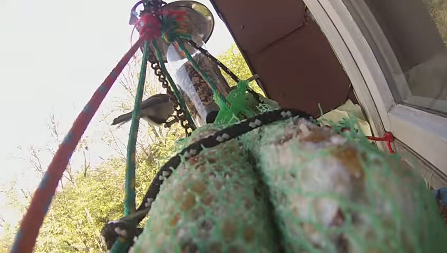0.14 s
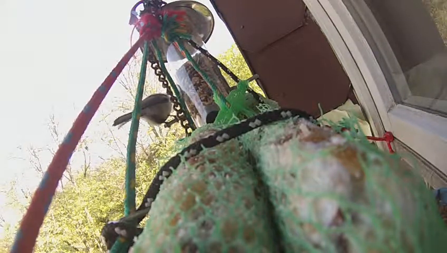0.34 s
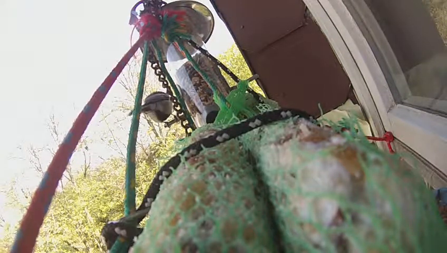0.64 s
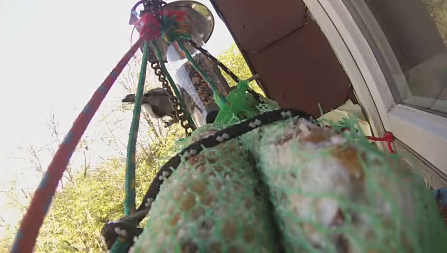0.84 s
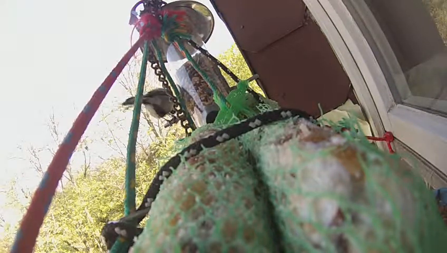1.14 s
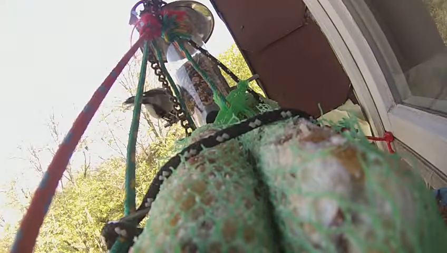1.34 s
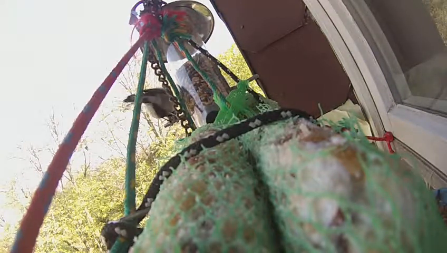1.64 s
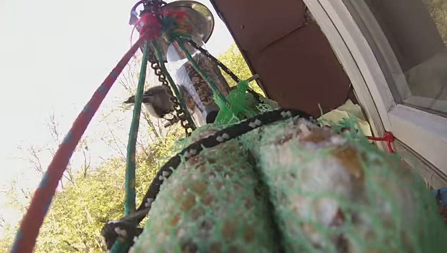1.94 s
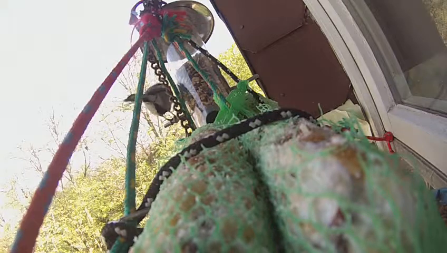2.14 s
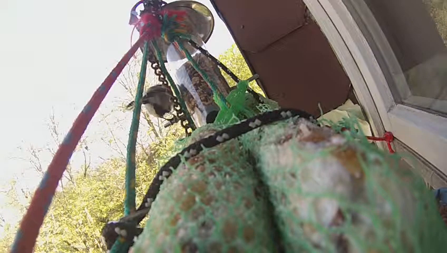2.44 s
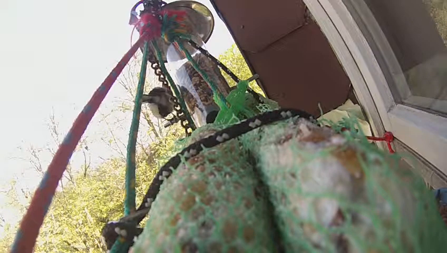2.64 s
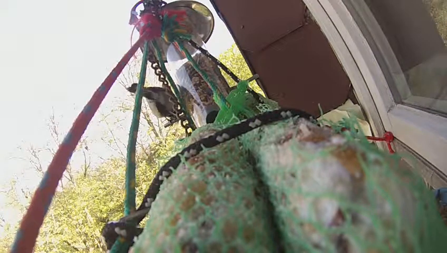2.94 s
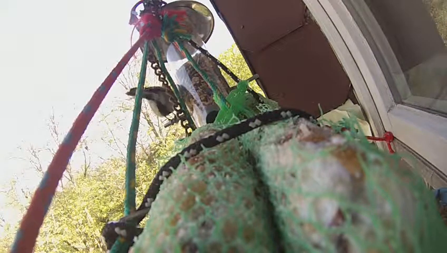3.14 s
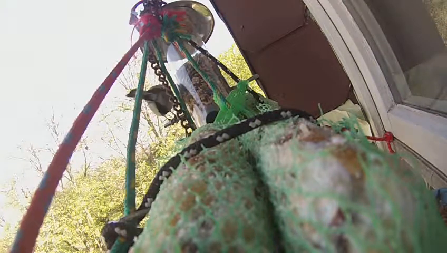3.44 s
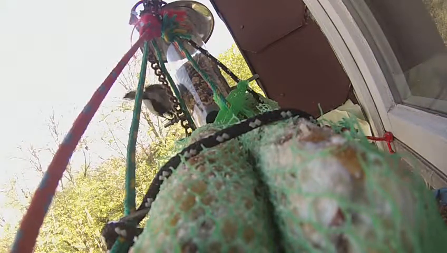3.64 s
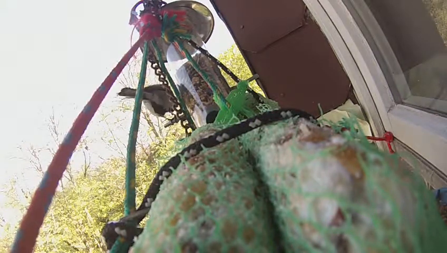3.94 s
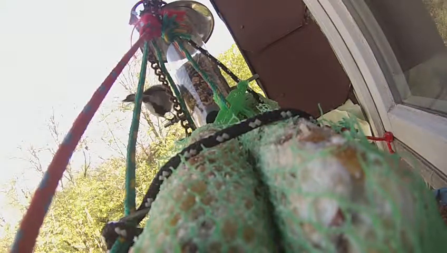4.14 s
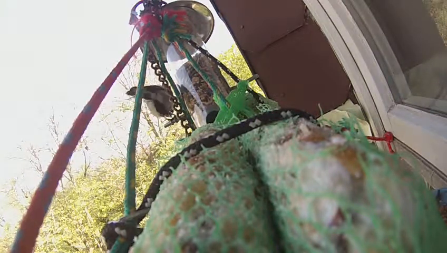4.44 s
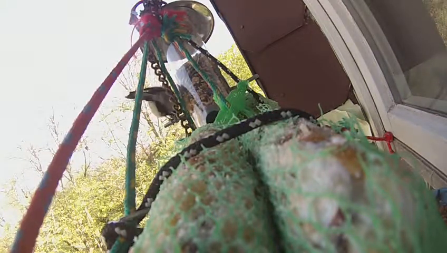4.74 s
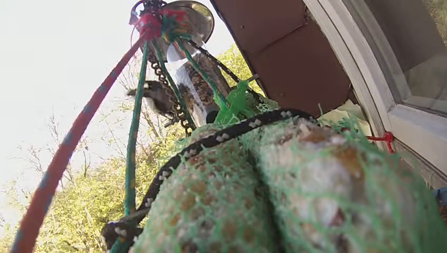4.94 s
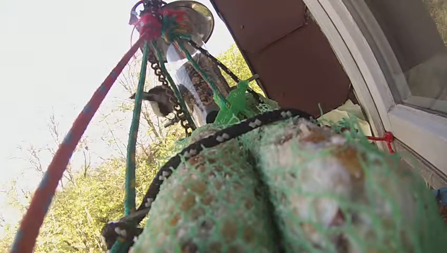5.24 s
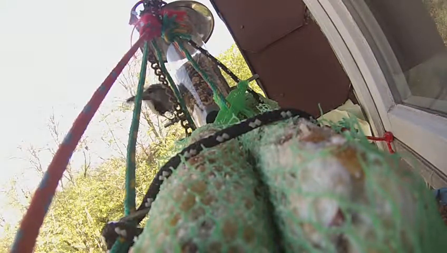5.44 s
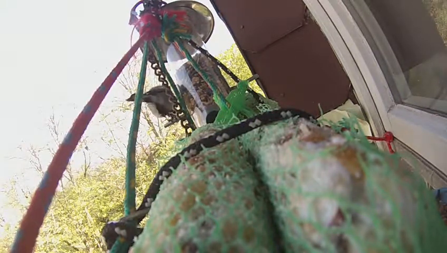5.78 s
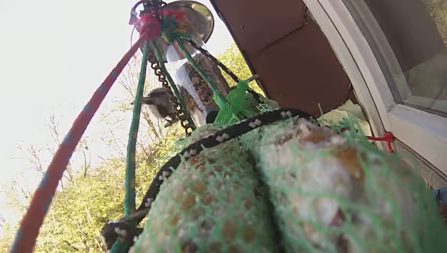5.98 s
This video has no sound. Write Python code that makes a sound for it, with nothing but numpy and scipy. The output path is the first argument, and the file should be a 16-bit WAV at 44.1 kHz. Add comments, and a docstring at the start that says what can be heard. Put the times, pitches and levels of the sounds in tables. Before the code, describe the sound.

Low trembling of a hanging feeder, felt through its hanger by a very close microphone, is broken by groups of woody, bassy pecks. The strongest group arrives around two seconds, including a hard clack; another follows after three and a half, and a final pair near the end. Loose parts chatter lightly. Steady outdoor air, thin hiss and a faint electronic buzz continue throughout.

```python
"""Bird pecking at a seed feeder

A small bird pecks at a hanging feeder; the microphone rides on the same hanger.
Blows ring modes of hanger and tube, loose parts chatter, the beak ticks and one hard clack sounds.
The hanger quivers near 33 Hz under a dull rumble; two far birds call as gliding two-partial tones.
Shaped noise makes the outdoor air, hiss and gated buzz; steady sines make the electronic whine."""
import sys
import numpy as np
from scipy import signal
from scipy.fft import rfft, irfft
from scipy.io import wavfile

SR = 44100
rng = np.random.default_rng(int(sys.argv[2]) if len(sys.argv) > 2 else 0)


def waveform_to_disk(signal):
    """Save audio, clipped to [-1, 1], as 16-bit WAV at the path in sys.argv[1]."""
    frames = np.transpose(np.atleast_2d(signal))
    scaled = np.clip(frames, -1, 1) * 32767
    samples = np.round(scaled).astype(np.int16)
    wavfile.write(sys.argv[1], SR, samples)


N = 269451
TIME = np.arange(N) / SR

# Pecks and taps. Each row: start in seconds, hanger thump in dB, tube ring in dB, rattle in dB
# before trim, beak tick in dB before trim, tube pitch as a ratio, swing height in dB rms.
PECKS = [(1.2849, -42, -49, -56.5, -72, 1.04, -43.5), (1.9942, -35.5, -46, -55.5, -66, 1.03, -45.5),
         (2.1421, -32, -45.5, -54.5, -62.5, 1, -35.5), (2.3082, -33.5, -45.5, -58, -63.5, .98, -36.5),
         (2.4407, -39.5, -57, -67, -82, 0.77, -59), (3.095, -55, -64, -84, -81, 1.05, -49.5),
         (3.589, -34.5, -48, -56, -65.5, 1, -42), (3.75, -32.5, -45.5, -53.5, -61, 1.015, -38.5),
         (3.939, -39, -57.5, -65, -71, 1.03, -38.5), (4.1282, -40.5, -56, -61, -75, 0.86, -41),
         (5.041, -34.5, -49, -63, -74, 1.04, -36.5), (5.555, -32.5, -52, -63.5, -72, 0.98, -37.5),
         (5.728, -34, -57.5, -78, -80, 1.05, -40)]


def undb(db):
    """Decibels to gain."""
    return 10 ** (np.asarray(db) / 20)


def level(x, db):
    """Set the rms level."""
    return x * undb(db) / np.sqrt(np.mean(x ** 2))


def strike(x, db, span_s):
    """Set the rms level of a blow over its first moments."""
    return x * undb(db) / np.sqrt(np.mean(x[:int(span_s * SR)] ** 2))


def add(out, s, x):
    """Mix a sound in at a time in seconds."""
    i = int(s * SR)
    out[i:i + len(x)] += x[:N - i]


def curves(table):
    """The columns of a timed table, joined by straight lines."""
    s, *columns = np.transpose(table)
    return [np.interp(TIME, s, c) for c in columns]


def walk(knots_per_s):
    """Slow random wander: normal draws joined by straight lines, spread near 1."""
    knots = rng.standard_normal(int(N / SR * knots_per_s) + 2)
    return np.interp(TIME * knots_per_s, np.arange(len(knots)), knots)


def noise(spectrum):
    """Noise with the colour of (Hz, dB) points, joined on a log frequency axis."""
    hz, db = np.transpose(spectrum)
    bins_hz = np.maximum(np.fft.rfftfreq(N, 1 / SR), 1)
    gain = undb(np.interp(np.log(bins_hz), np.log(hz), db))
    return irfft(rfft(rng.standard_normal(N)) * gain, N)


def soften(x, hz):
    """A longer, gentler contact loses its treble."""
    cutoff_hz = min(hz, SR / 3)
    return signal.sosfilt(signal.butter(2, cutoff_hz, fs=SR, output="sos"), x)


def ring(modes, spread, pitch=1):
    """A third of a second of a struck body; each contact point weights its decaying modes differently."""
    t = TIME[:SR // 3]
    weights = 1 + spread * rng.standard_normal(len(modes))
    out = np.zeros(len(t))
    for weight, (hz, db, t60_s, polarity) in zip(weights, modes):
        decay = np.exp(-np.log(1000) * t / t60_s)
        out += weight * np.sign(polarity) * undb(db) * np.sin(2 * np.pi * pitch * hz * t) * decay
    return out


def chatter(modes, length_s, count, detune=0.12, fade_db=-7):
    """A quick, uneven, dying run of tiny collisions between loose parts, each with its own pitch."""
    out = np.zeros(SR // 3)
    for k, (late, size, tuning) in enumerate(rng.random((count, 3))):
        progress = (k + 0.8 * late) / count
        i = int(progress * length_s * SR)
        hit = ring(modes, spread=0.41, pitch=1 + detune * (tuning - 0.5))
        gain = (0.5 + size) * undb(fade_db * progress ** 2)
        out[i:] += gain * hit[:len(out) - i]
    return out


def pecks(rattle_trim_db=0.86, tick_trim_db=-0.3, settle_db=-70, settle_s=0.052, firm_db=-54, firm_hz=3200):
    """The beak ticks, the hanger and tube ring, loose parts jump and fall back a moment later."""
    # Modes of the hanger, tube, loose fittings with chain, and port that the beak hits; close opposed
    # tube pairs make the ring swell after the blow. Each row: nominal pitch in Hz, relative level in dB,
    # t60 in seconds, polarity at the microphone (sign).
    hanger = [(48, -7, 0.082, 1), (59.55, -8, 0.385, 1), (78, 3, 0.094, -1), (115.4, -16.5, 0.15, -1),
              (149, -9, 0.023, 1)]
    tube_modes = [(256.2, -22.5, 0.16, 1), (280.6, -28, 0.22, -1), (364.7, 0.5, 0.044, 1),
                  (364.3, -4, 0.1, -1), (436, -6, 0.024, -1), (453, -15, 0.067, 1), (470.4, -36, 0.49, 1),
                  (537, -29, 0.2, 1)]
    fittings = [(666, -6, 0.024, 1), (718, -5, 0.051, -1), (950, -0.5, 0.028, 1), (1070, -8.5, 0.054, -1),
                (1230, -0.5, 0.025, 1), (1545, -3, 0.035, -1), (1640, -3.5, 0.022, 1),
                (2270, -6.5, 0.0093, -1)]
    port = [(2480, -6, 0.014, -1), (2640, 2.5, 0.0065, 1), (3640, 0.5, 0.0046, -1), (5370, -2, 0.012, 1),
            (5660, -11.5, 0.05, -1), (6680, -2, 0.0096, 1), (8600, -16, 0.013, -1)]
    out = np.zeros(N)
    for s, thump_db, tube_db, rattle_db, tick_db, pitch, _ in PECKS:
        thump = ring(hanger, spread=0.041)
        add(out, s, strike(thump, thump_db, span_s=0.028))
        tube = ring(tube_modes, spread=0.032, pitch=pitch)
        add(out, s, strike(tube, tube_db, span_s=0.026))
        tick = chatter(port, length_s=0.008, count=9)
        add(out, s, strike(tick, tick_db + tick_trim_db, span_s=0.012))
        # the harder the parts are thrown, the brighter they collide
        bright_hz = firm_hz * undb((rattle_db - firm_db) / 2)
        jump = soften(chatter(fittings, length_s=0.013, count=8), bright_hz)
        add(out, s, strike(jump, rattle_db + rattle_trim_db, span_s=0.019))
        # they drop back under their own weight, at a level capped by the rattle
        drop = soften(chatter(fittings, length_s=0.0071, count=2), hz=1500)
        add(out, s + settle_s, strike(drop, min(rattle_db, settle_db), span_s=0.037))
    return out


def clack(start_s=2.3278, clack_db=-48.5):
    """One hard clack as the feeder swings against its chain: a burst of decaying modes."""
    # Each row: pitch in Hz, relative level in dB, t60 in seconds, polarity at the microphone (sign).
    modes = [(567, -0.5, 0.062, 1), (680, -2.5, 0.024, 1), (1230, 2, 0.019, 1), (1310, -15, .012, 1),
             (1980, -29, 0.007, -1), (2880, -17, .012, 1)]
    out = np.zeros(N)
    add(out, start_s, strike(ring(modes, spread=0.05), clack_db, span_s=0.015))
    return out


def quiver(quiver_hz=33, waver=0.01, creak_db=-32, still_db=-74):
    """Each peck or weight shift stills the hanger's old swing and starts one that builds and dies."""
    # The bird shifts its weight. Each row: start in seconds, rise time in seconds, swing height in dB rms.
    fidgets = [(.18, .16, -55.5), (.363, 0.12, -51.5), (.88, 0.14, -47), (1.17, 0.1, -48.5),
               (1.505, 0.075, -51), (1.68, .08, -52), (1.84, 0.11, -45), (2.64, 0.13, -48.5),
               (2.93, 0.095, -45.5), (3.254, .11, -47.5), (3.47, .12, -53), (4.38, .12, -49.5),
               (4.62, .12, -50), (4.835, .12, -51.5), (5.29, .13, -45)]
    peck_lag_s, peck_rise_s = 0.0069, 0.11
    grip_s = 0.071  # time constant of stilling the old swing
    pushes = [(s + peck_lag_s, peck_rise_s, db) for s, *_, db in PECKS] + list(fidgets)
    phase = 2 * np.pi * np.cumsum(quiver_hz * (1 + waver * walk(4))) / SR
    swing, envelope = np.zeros(N), np.zeros(N)
    for s, rise_s, db in sorted(pushes):
        t = np.maximum(TIME - s, 0)
        size = undb(db) * t / rise_s * np.exp((1 - (t / rise_s) ** 2) / 2)
        kept = np.exp(-t / grip_s)
        swing = kept * swing - size * np.sin(phase - phase[int(s * SR)])
        envelope = kept * envelope + size
    # dull rumble follows the swing; points in Hz and relative dB
    rumble_colour = [(15, -12), (40, -9), (90, 4.0), (150, -9), (400, -25), (1000, -58)]
    rumble = level(noise(rumble_colour), creak_db)
    still = undb(still_db) * np.sin(phase)  # quiver left when the bird sits still
    return np.sqrt(2) * (swing + still) + envelope * rumble


def far_bird(call, second_db, waver):
    """One gliding, slightly wavering note with two partials."""
    hz, db = curves(call)
    phase = 2 * np.pi * np.cumsum(hz * (1 + waver * walk(149))) / SR
    sounding = (TIME > call[0][0]) & (TIME < call[-1][0])
    return sounding * undb(db) * (np.sin(phase) + undb(second_db) * np.sin(2 * phase))


def far_birds():
    """A low call and a thin peep, each a gliding tone."""
    # Each row: time in seconds, pitch in Hz before waver, peak level of the first partial in dB.
    low_call = [(.27, 1080, -100), (.32, 1143, -77), (.36, 1190, -71), (.43, 1197, -68), (.47, 1195, -78),
                (.52, 1120, -100)]
    peep = [(1.255, 3850, -100), (1.28, 4080, -82), (1.305, 4300, -77), (1.335, 4320, -77),
            (1.37, 4280, -80), (1.41, 4230, -100)]
    return far_bird(low_call, second_db=-7.0, waver=0.003) + far_bird(peep, second_db=-30, waver=0.012)


def buzz(puff_s=0.0025, scatter_db=1.0, buzz_db=-78.5):
    """Several clocks in the electronics each let through a short puff of hiss on every beat."""
    # Each row: puffs per second, relative level in dB.
    clocks = [(20, 3.5), (46.9, -3.5), (60, -3)]
    # Puff colour. Each row: frequency in Hz, relative density in dB per Hz.
    colour = [(4000, -34), (6300, -7), (7100, 2), (8000, -11), (9000, -10), (9900, -2.5), (10400, -5),
              (11000, 0.5), (11700, -6.5), (12500, -4), (14000, -21)]
    gate = np.zeros(N)
    for hz, db in clocks:
        gate += undb(db) * ((TIME + rng.random()) % (1 / hz) < puff_s)
    scatter = undb(scatter_db * walk(60))
    return level(gate * scatter * noise(colour), buzz_db)


def background(air_db=-61.5, drift_db=0.2, hiss_db=-74):
    """Gently drifting outdoor air under microphone hiss and the buzz and whine of the electronics."""
    # Air and hiss colours. Each row: frequency in Hz, relative density in dB per Hz.
    air_colour = [(20, -11), (60, -1.5), (85, -4.5), (150, -10.5), (230, -12), (360, -14), (480, -16),
                  (1200, -20.5), (2500, -24), (6000, -30), (7800, -56)]
    hiss_colour = [(4000, -30), (6000, -5.5), (6700, 0.5), (7300, 1), (7750, -3), (9000, -3), (10000, -1.5),
                   (10500, -4.5), (11000, -0.5), (11600, -6), (12400, -3.5), (14200, -11), (15000, -7)]
    # Electronic whine. Each row: pitch in Hz, level in dB rms.
    whine_tones = [(7000, -101), (7253, -96), (7313, -95), (10000, -99), (11000, -98), (12000, -100)]
    air = level(noise(air_colour), air_db) * undb(drift_db * walk(4.0))
    hiss = level(noise(hiss_colour), hiss_db)
    whine = sum(level(np.sin(2 * np.pi * hz * TIME), db) for hz, db in whine_tones)
    return air + hiss + buzz() + whine


def scene():
    """Everything at the one microphone."""
    return (pecks() + clack() + quiver() + far_birds() + background())[None]


def record(dry, top_hz=15250):
    """The recorder cuts the top steeply."""
    return signal.sosfilt(signal.ellip(10, 0.2, 70, top_hz, fs=SR, output="sos"), dry)


dry = scene()
out = record(dry)
waveform_to_disk(out)
```